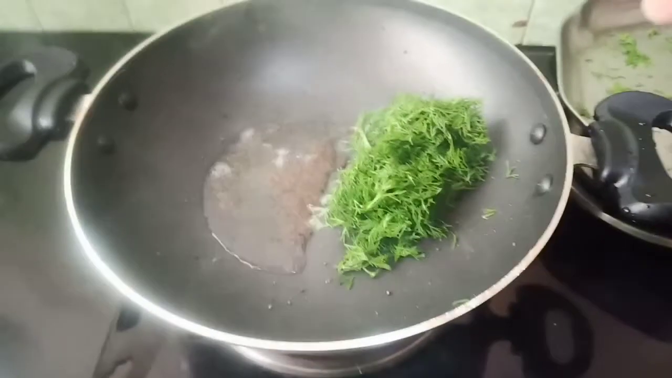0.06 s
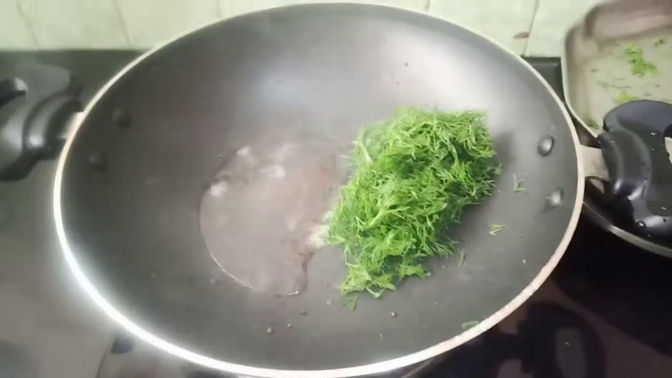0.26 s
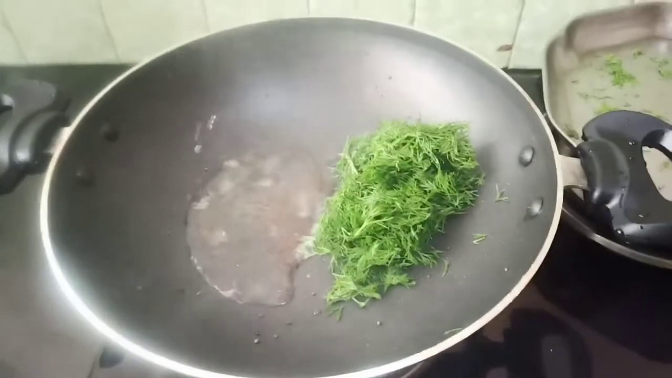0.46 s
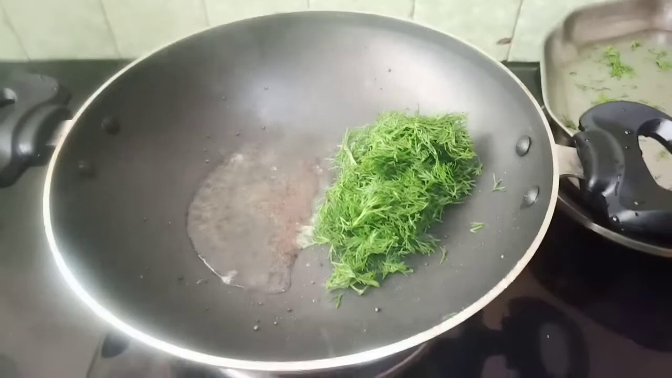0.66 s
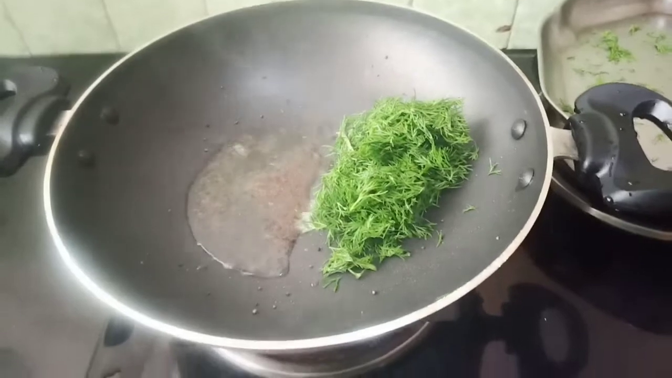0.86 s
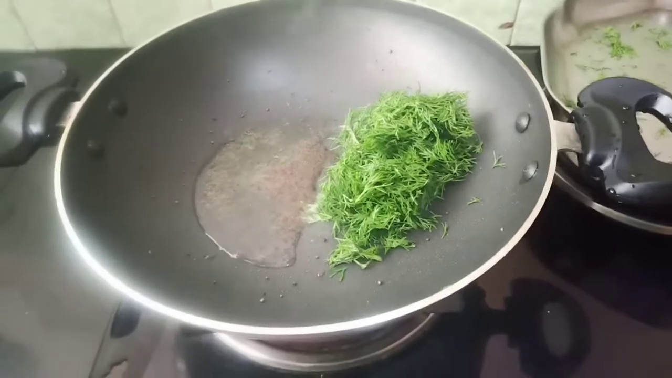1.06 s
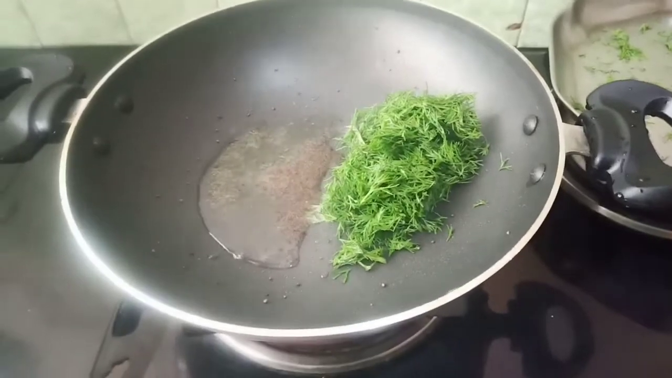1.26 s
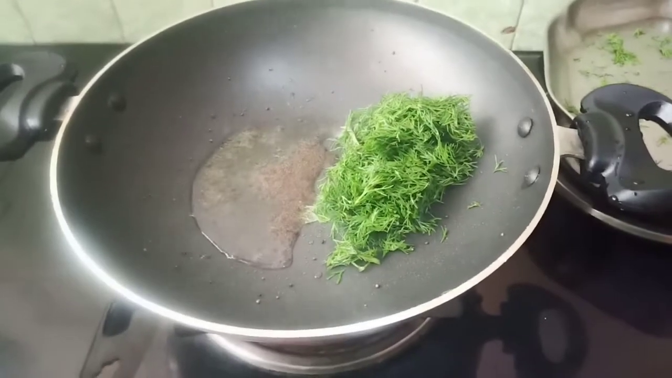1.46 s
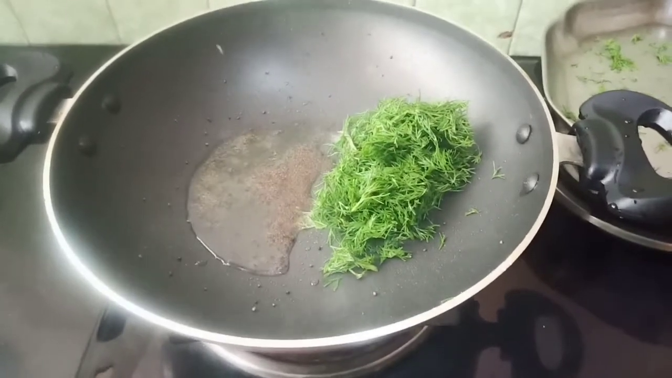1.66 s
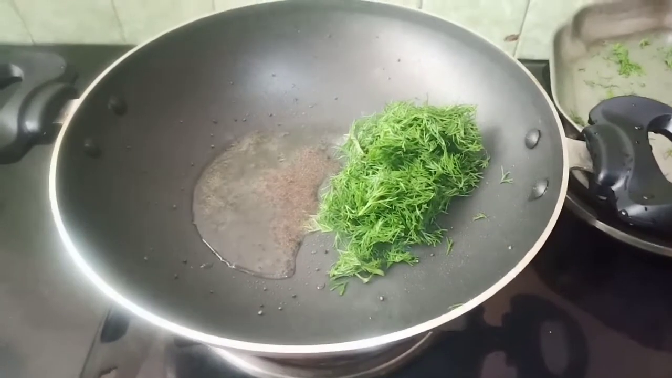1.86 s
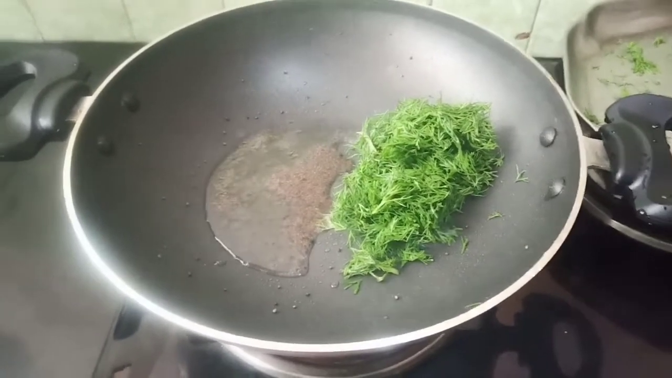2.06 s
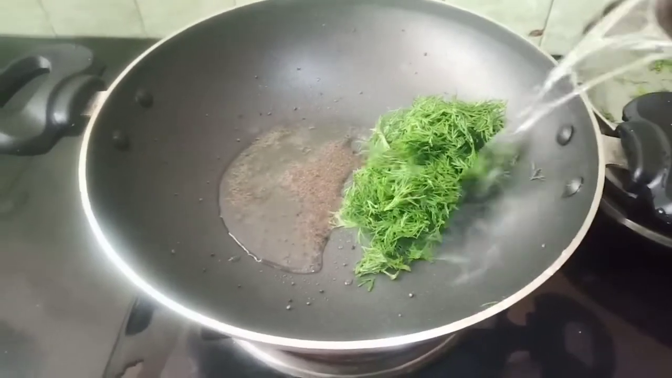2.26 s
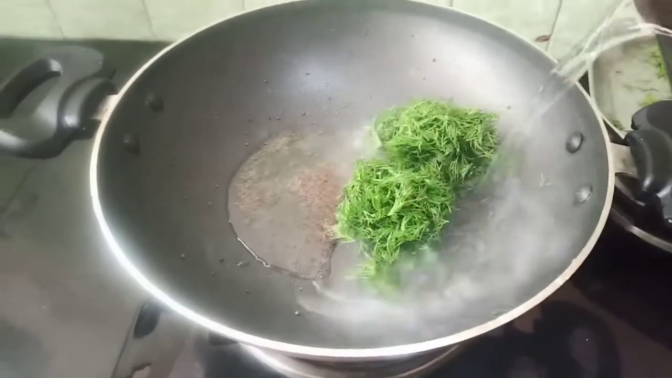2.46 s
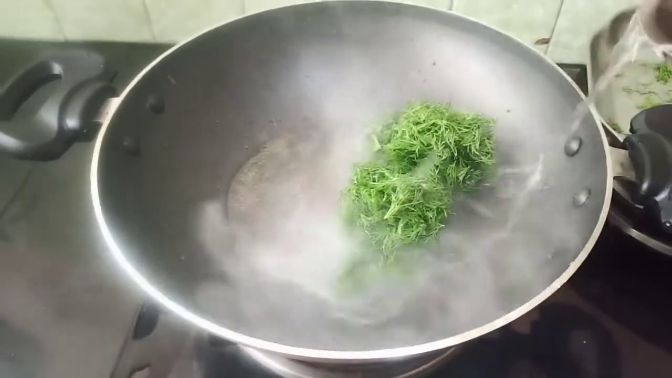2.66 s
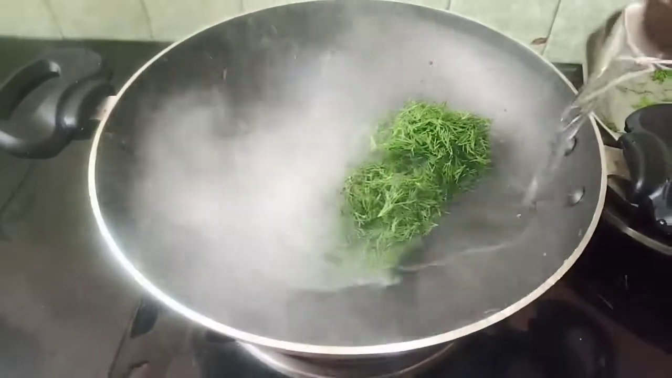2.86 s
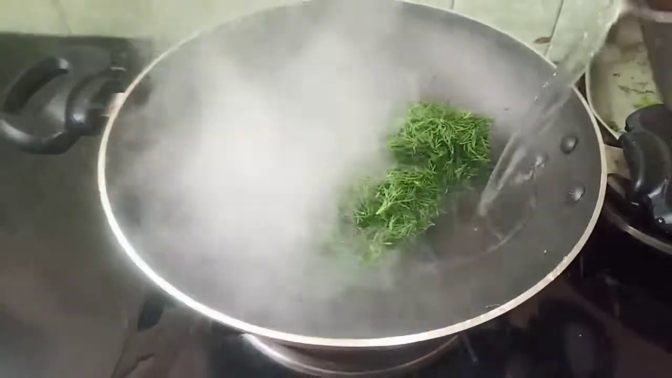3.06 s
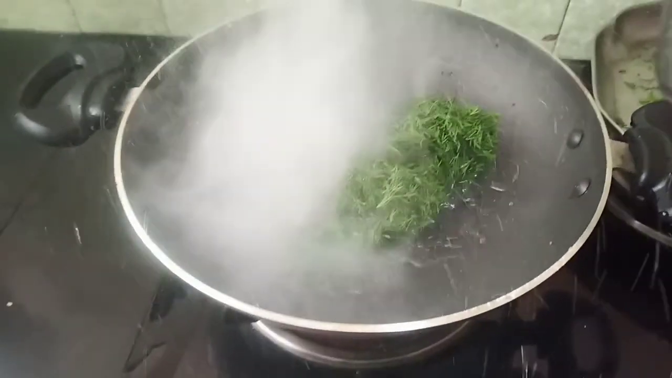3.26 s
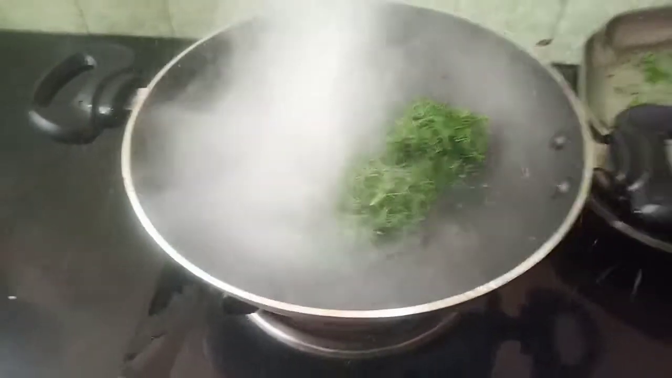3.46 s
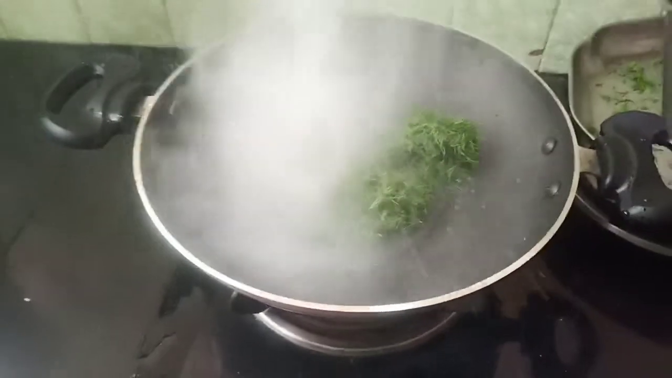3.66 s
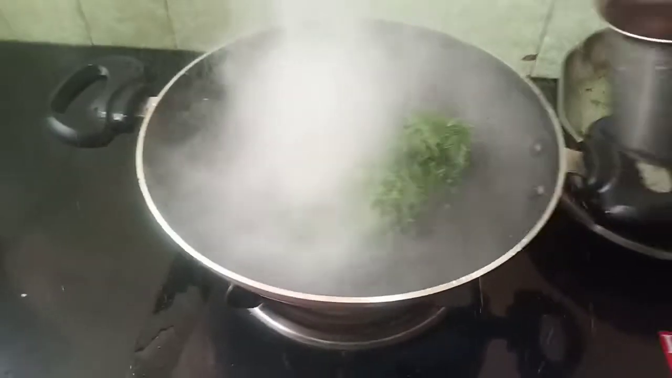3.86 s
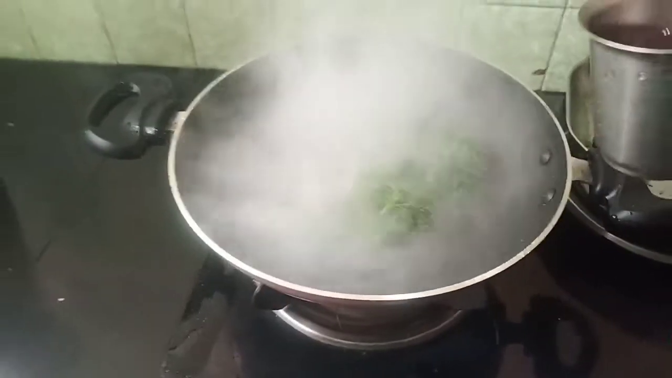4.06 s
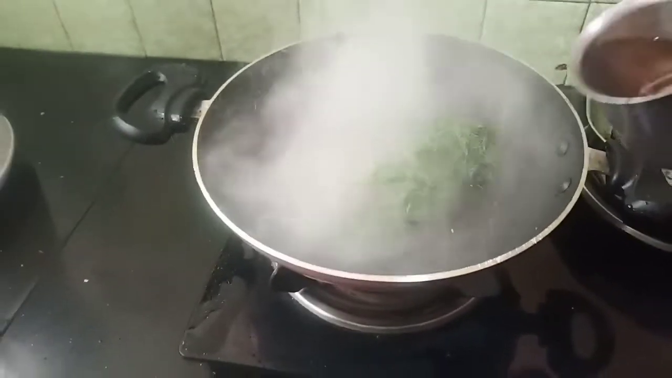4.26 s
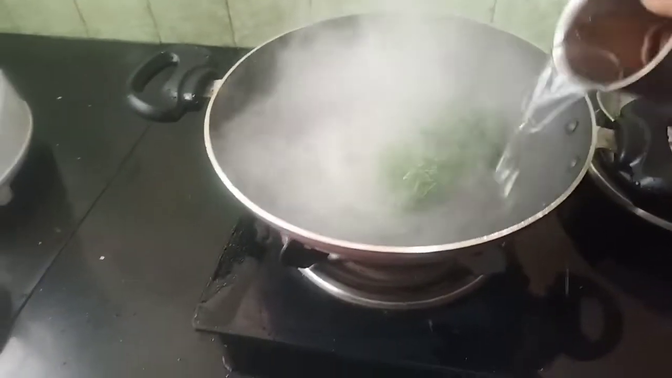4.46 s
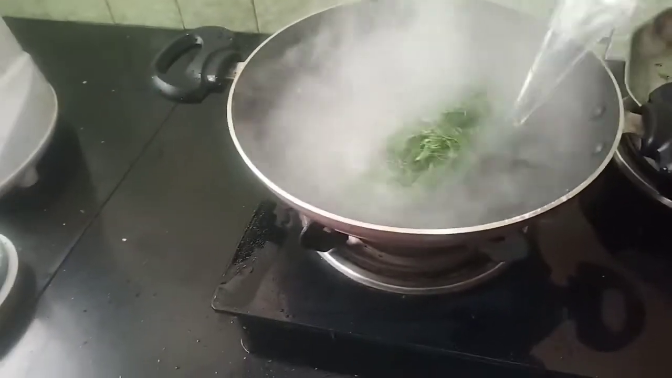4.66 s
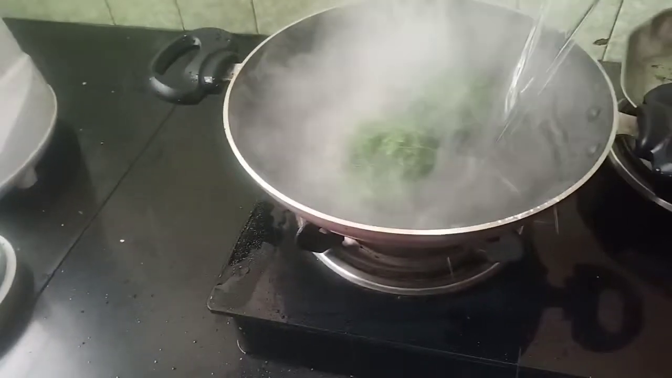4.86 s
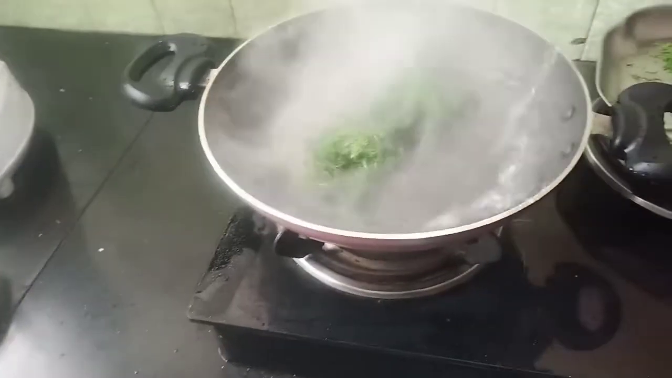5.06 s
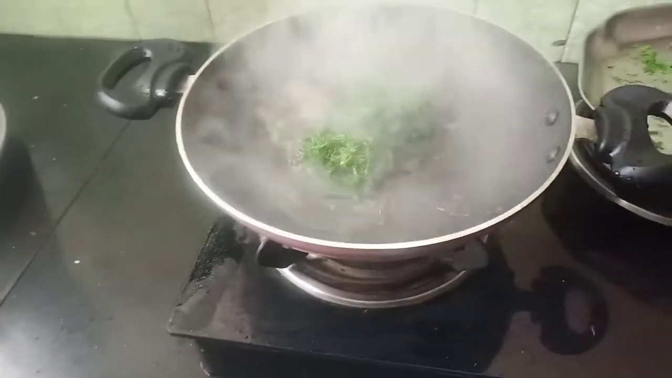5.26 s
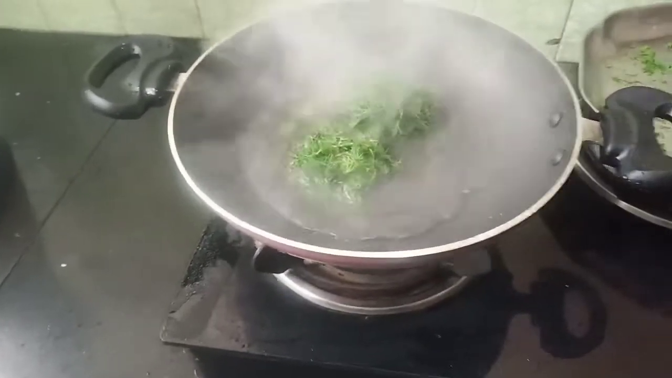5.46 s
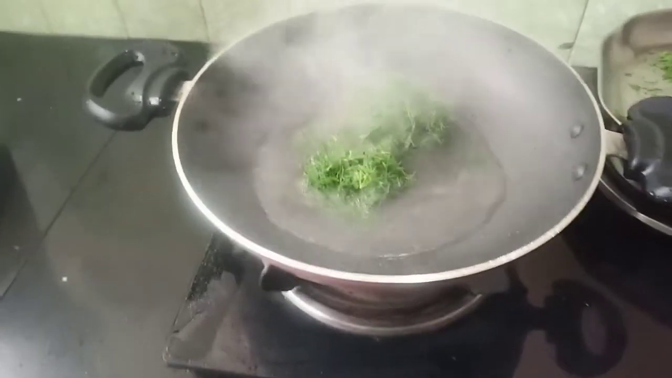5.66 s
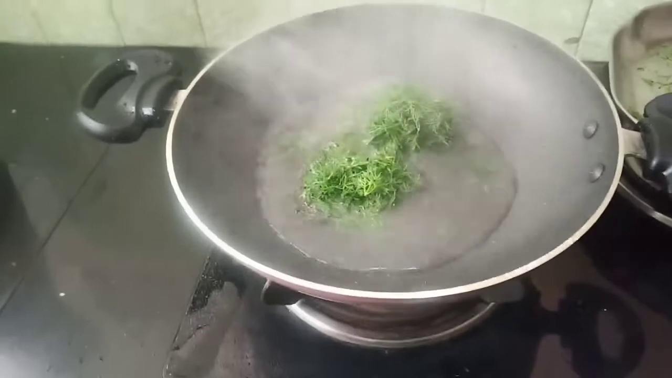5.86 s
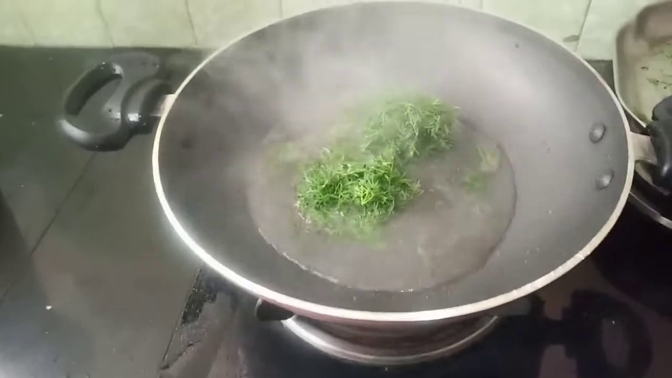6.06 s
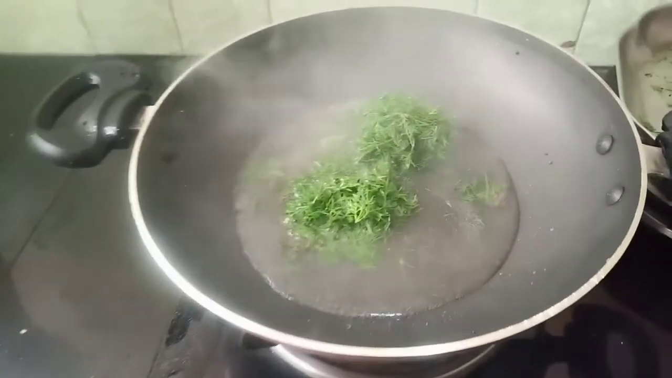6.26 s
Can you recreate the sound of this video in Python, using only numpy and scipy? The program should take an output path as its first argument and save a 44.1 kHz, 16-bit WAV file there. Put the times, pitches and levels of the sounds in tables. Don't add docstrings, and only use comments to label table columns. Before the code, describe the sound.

Hot oil crackles and spits sharply in a pan, then poured water boils off in a loud steaming hiss over a bubbling gurgle.

```python
import sys
import numpy as np
from scipy import signal
from scipy.io import wavfile
from scipy.ndimage import uniform_filter1d

SR = 44100
rng = np.random.default_rng(int(sys.argv[2]) if len(sys.argv) > 2 else 0)


def level_to_linear(level):
    exponent = np.asarray(level, float) / 20
    return 10 ** exponent


def transcribe(signal):
    frames = np.atleast_2d(signal).T
    limited = np.clip(frames, -1, 1)
    pcm = np.round(limited * 32767).astype(np.int16)
    wavfile.write(sys.argv[1], SR, pcm)


N = 279229


def unit(x):
    return x / np.sqrt(np.mean(x ** 2) + 1e-20)


def in_time(rows):
    s, *columns = np.transpose(rows)
    return [np.interp(np.arange(N) / SR, s, c) for c in columns]


def drift(rate):
    r = np.exp(-40 * np.pi * rate / SR)
    noise = rng.standard_normal(N // 20 + 2002)
    slow = signal.lfilter([1], [1, -2 * r, r * r], noise)[2000:]
    return np.interp(np.arange(N) / 20, np.arange(len(slow)), unit(slow))


def butter(x, hz, kind, order=2):
    return signal.sosfilt(signal.butter(order, hz, kind, fs=SR, output="sos"), x)


def clicks(times, sizes):
    out = np.full(N, 1e-18)
    np.add.at(out, np.clip((np.asarray(times) * SR).astype(int), 0, N - 1), sizes)
    return out


def ring(x, hz, t60):
    r, w = level_to_linear(-60 / (t60 * SR)), 2 * np.pi * hz / SR
    return signal.lfilter([0, np.sin(w)], [1, -2 * r * np.cos(w), r * r], x)


def peak(x, hz, width, db):
    r = np.exp(-np.pi * width / SR)
    w = 2 * np.pi * min(hz, .45 * SR) / SR
    resonance = signal.lfilter([1, 0, -1], [1, -2 * r * np.cos(w), r * r], x)
    return x + (level_to_linear(db) - 1) * (1 - r * r) / 2 * resonance


def grains(per_s, spread_db, clump_db):
    sizes = level_to_linear(spread_db * np.minimum(rng.exponential(1, N), 4.0)) * rng.choice([-1, 1], N)
    bursting = rng.random(N) < per_s * level_to_linear(clump_db * drift(40)) / SR
    return unit(sizes * bursting)


def flame():
    return level_to_linear(-79) * unit(butter(rng.standard_normal(N), [25, 135], "band"))


KITCHEN_T60_S = 0.41


def kitchen(x):
    t = np.arange(SR // 2) / SR
    tail = rng.standard_normal(len(t)) * level_to_linear(-60 * t / KITCHEN_T60_S) * (t > .004)
    tail = tail / np.sqrt(np.sum(tail ** 2))
    return signal.fftconvolve(x, butter(tail, 6200, "low"))[:N]


# start_s [s], peak_db [dB], pitch_hz [Hz], t60_s [s]
GULPS = [(.075, -52, 335, 0.064), (0.151, -52, 344, 0.087)]


def gulps():
    low_rings = sum(ring(clicks([s], level_to_linear(db)), hz, t60) for s, db, hz, t60 in GULPS)
    return butter(low_rings, [200, 500], "band")


# start_s [s], depth_db [dB], recovery_s [s]
LULLS = [(5.134, -7, .03), (4.508, -3, .02)]


def lulls():
    t = np.arange(N) / SR
    return level_to_linear(sum(db * np.exp(-np.maximum(t - s, 0) / back) * (t > s) for s, db, back in LULLS))


# time_s [s], level_db at 7 kHz [dB]
VIGOUR = [(0.0, -33), (0.3, -29), (0.6, -32), (1.0, -32), (1.3, -32.5), (1.55, -29.5), (2.15, -30),
          (2.38, -24), (2.75, -28), (3.1, -23.5), (3.5, -25), (4.0, -27.5), (4.45, -25), (4.9, -25),
          (5.3, -27), (5.7, -27.5), (6.0, -31.5), (6.33, -33)]
# centre_s [s], rise_db [dB], half_width_s [s]
FLARES = [(0.155, 6, 0.012), (0.215, 3.5, 0.015), (0.693, 3.5, 0.01), (2.13, 3, 0.014), (2.515, 2, 0.0085),
          (3.582, 0.5, 0.022), (3.956, 3.5, 0.065), (4.919, 2.5, 0.015), (5.093, 2.5, 0.023),
          (5.273, 2.5, 0.032), (5.443, 2.2, 0.018)]
# centre_s [s], dip_db [dB], half_width_s [s]
PAUSES = [(0.105, -5, 0.01), (0.524, -6.5, 0.026), (0.763, -5.5, 0.018), (0.823, -1.5, 0.023),
          (0.903, -0.5, 0.017), (1.127, -4, 0.012), (1.611, -3, 0.03), (1.836, -3, 0.087),
          (1.976, -4.5, 0.02), (2.21, -5, 0.069), (2.26, 0, 0.012), (2.599, -3, 0.031), (2.664, -5, 0.0087),
          (2.814, -3, 0.023), (2.973, -2.0, 0.013), (3.273, -2, 0.079), (3.866, -1.5, 0.012),
          (4.525, -2.5, 0.012), (4.624, -5.5, 0.057), (4.859, -2.5, 0.024), (5.158, -6.5, 0.019),
          (5.343, -1.5, 0.011), (5.493, -5.5, 0.015), (5.577, -2.5, 0.02), (5.677, -4.4, 0.013),
          (5.762, -3.5, 0.011), (5.907, -4, 0.023), (5.996, -6, 0.0093), (6.191, -2, 0.016),
          (6.256, -5.5, 0.012)]


def vigour():
    t, level_db = np.arange(0, N, 40) / SR, in_time(VIGOUR)[0]
    bells = sum(db * np.exp(-.5 * ((t - s) / width) ** 2) for s, db, width in FLARES + PAUSES)
    level_db = level_db + np.interp(np.arange(N) / SR, t, bells)
    return level_db, level_db - uniform_filter1d(level_db, size=SR // 2)


# time_s [s], amount [0-1]
WATER = [(0, 0.23), (.3, 0.53), (.5, 0), (.9, 0.1), (1.25, -.25), (1.5, -.25), (1.8, 0.2), (2.15, 0.12),
         (2.4, 0.36), (2.55, 0.78), (3.0, 0.82), (3.6, 0.99), (4.05, 0.98), (4.55, 0.93), (5.13, 1.04),
         (5.5, 1), (5.7, 1), (6.33, 0.79)]
# time_s [s], amount [0-1]
CHURN = [(0, 0.33), (.3, 0.48), (.5, 0.2), (1.4, 0), (1.57, 0.1), (1.75, 0.03), (2.2, 0.06), (2.5, 0.63),
         (3.1, 1.1), (3.3, 1), (3.54, 1.15), (4.05, 0.94), (4.36, .9), (4.53, 1.05), (4.92, 0.89),
         (5.4, 0.84), (6.08, .5), (6.33, 0.78)]
# time_s [s], coarseness_db [dB]
COARSE = [(0, 0.5), (.2, -3), (.55, 1), (.95, 2), (1.3, 1), (1.6, 1.7), (2.15, -0.5), (2.4, -1), (2.7, 0.3),
          (3.1, -0.9), (3.6, 0.4), (4.0, -0.2), (4.45, 0.8), (4.9, 0), (5.15, 2.5), (5.35, -0.3),
          (5.8, 0.9), (6.33, 0.2)]
# pitch_hz [Hz], level_db [dB per Hz]
BOIL_COLOUR = [(60, -4), (100, -6.5), (150, -1.5), (300, -2), (420, 2), (560, -1), (800, -3), (1300, -2.5),
               (2300, 0)]
SMALL_DB, SMALL_WET_DB = -24.0, 8.5
LARGE_DB, LARGE_WET_DB = -79.5, 26.5
RUMBLE_DB, RUMBLE_CHURN_DB = -79.5, 27.5
SMALL_COARSE = 0.99


def boil():
    water_share, slow_db = in_time(WATER)[0], in_time(VIGOUR)[0]
    pulse_db = vigour()[0] - slow_db
    small_db = slow_db + SMALL_DB + SMALL_WET_DB * water_share + SMALL_COARSE * in_time(COARSE)[0]
    large_db = LARGE_DB + LARGE_WET_DB * water_share
    rumble_db = RUMBLE_DB + RUMBLE_CHURN_DB * in_time(CHURN)[0]
    levels_db = (rumble_db + 15, large_db + 19, small_db + 12)
    bubbles = grains(per_s=1200, spread_db=5.0, clump_db=3.0)
    water = rng.standard_normal((2, N))
    out, edges = 0, 480 * 1.499 ** np.arange(-5, 5)
    points_hz, points_db = np.transpose(BOIL_COLOUR)
    for k, (low, high) in enumerate(zip(edges, edges[1:])):
        hz = np.sqrt(low * high)
        level_db = levels_db[np.searchsorted([480, 720], hz)]
        colour_db = np.interp(np.log(hz), np.log(points_hz), points_db)
        band = butter(0.38 * bubbles + 0.87 * water[k % 2], [low, high], "band", order=3)
        out = out + band * level_to_linear(level_db + colour_db + 1.4 * drift(12))
    return out * level_to_linear(pulse_db)


# start_s [s], peak_db [dB], pitch_hz [Hz], t60_s [s]
BUBBLES = [(0.0316, -29.5, 3250, 0.023), (.0787, -37, 3430, .02), (.171, -26.5, 2200, 0.0042),
           (0.198, -33, 1300, 0.0058), (.2024, -36, 3600, 0.078), (0.22, -26, 3780, .018),
           (0.272, -28, 4080, 0.017), (.3326, -30, 3330, .015), (.3561, -29, 3560, 0.032),
           (.3575, -22.5, 1880, 0.013), (0.3576, -16, 1230, 0.0029), (0.377, -29, 1570, 0.016),
           (.7075, -24.5, 3610, 0.021), (.7205, -36, 3500, .025), (.7075, -38, 2690, .005),
           (3.885, -5, 3000, 0.00073)]
BUBBLE_ECHO_DB = -3.5
# start_s [s], level_db [dB]
PAN_KNOCKS = [(0.9081, -26.5), (1.5202, -19.5)]
# pitch_hz [Hz], level_db [dB], t60_s [s], echo_db [dB]
PAN_MODES = [(2395, -0.5, 0.03, 3), (2400, -19, 0.49, -4), (1740, -11, 0.036, -12), (1370, -29, .015, -13),
             (3470, -13, 0.032, -9), (2160, -22, 0.038, 8)]
# start_s [s], level_db [dB]
CUP_KNOCKS = [(5.8475, -25.5)]
# pitch_hz [Hz], level_db [dB], t60_s [s], echo_db [dB]
CUP_MODES = [(3720, 1.5, 0.037, -8), (3812, -10, 0.27, -12), (6640, -1.5, .1, -8), (1230, -4, 0.056, 1.5),
             (1160, -20, .06, 7)]
CRACK_DB, CRACK_S = -4, 0.0025


def pings():
    out = np.zeros((2, N))
    rows = [(s, db, hz, t60, BUBBLE_ECHO_DB) for s, db, hz, t60 in BUBBLES]
    for knocks, modes in ((PAN_KNOCKS, PAN_MODES), (CUP_KNOCKS, CUP_MODES)):
        for s, db in knocks:
            rows += [(s, db + mode_db, hz, t60, echo_db) for hz, mode_db, t60, echo_db in modes]
    for s, db, hz, t60, echo_db in rows:
        start = int(s * SR)
        hit = clicks([0], level_to_linear(db))[:min(N - start, SR // 4)]
        out[:, start:start + len(hit)] += ring(hit, hz, t60) * level_to_linear(np.array([[0], [echo_db]]))
    s, db = np.transpose(PAN_KNOCKS + CUP_KNOCKS)
    decay = np.exp(-1 / (CRACK_S * SR))
    crack = signal.lfilter([1], [1, -decay], clicks(s, level_to_linear(db + CRACK_DB))) * rng.standard_normal(N)
    return butter(out + butter(crack, 5000, "low"), 960, "high", order=4)


# start_s [s], step_db [dB], direction [+1 or -1]
THUMPS = [(.5258, -9, 1), (2.63, -19.5, -1), (2.658, -24.5, -1), (2.7295, -8, -1), (2.8886, -12.5, -1),
          (2.8925, -7, 1), (2.9251, -15, 1), (2.93, -15.5, -1), (2.9465, -17, -1), (3.0308, -16.5, -1),
          (3.056, -5.5, 1), (3.0606, -4.5, -1), (3.0713, -12, -1), (3.074, -16, 1), (3.0966, -15, 1),
          (3.1345, -18, 1), (3.1518, -17, -1), (3.1744, -9, -1), (3.1761, -16, 1), (3.1772, -2.5, 1),
          (3.18, -11, -1), (3.2005, -11.5, 1), (3.2009, -10, -1), (3.2083, -13, -1), (3.2773, -12.5, 1),
          (3.6296, -12, 1), (3.6766, -4, -1), (3.7048, -23, 1), (3.787, -23, 1), (3.8225, -12.5, 1)]
# start_s [s], step_db [dB], direction [+1 or -1]
MORE_THUMPS = [(3.039, -19, 1), (3.0791, -19, 1), (3.1485, -24, -1), (3.3252, -25, -1), (3.7513, -25, 1)]


def thumps():
    s, db, direction = np.transpose(THUMPS + MORE_THUMPS)
    steps = np.cumsum(clicks(s, np.sign(direction) * level_to_linear(db)))
    pole = np.exp(-2 * np.pi * 700 / SR)
    soft = signal.lfilter([1 - pole], [1, -pole], steps)
    return 0.5 * soft + 0.33 * butter(steps, 4300, "low")


# start_s [s], peak_db [dB]
SEED_SPITS = [(.0293, -14.5), (.065, -15.3), (.0808, -14.7), (.102, -15), (.1319, -15.4), (.1428, -11.7),
              (.154, -12.7), (.2185, -13), (.2512, -13.8), (.268, -13.3), (.299, -13.9), (.4292, -15.2),
              (.4791, -14.9), (.6792, -14.9), (.7078, -14.9), (.7234, -12.2), (.8078, -14), (.8891, -14.1),
              (.9026, -14.4), (.9639, -13), (1.1081, -14.6), (1.1693, -17.1), (1.2751, -15.6),
              (1.4838, -16.5), (1.5699, -15.1), (1.6156, -14.9), (2.0815, -16.4), (2.1303, -15.8),
              (2.1538, -14.2), (2.2451, -15.5)]
# start_s [s], peak_db [dB]
WATER_SPITS = [(2.6119, -12.8), (2.7292, -12.4), (2.8884, -8.1), (2.9209, -11.2), (3.1051, -9.5),
               (3.1169, -8), (3.3254, -11), (3.6116, -9.7), (3.8237, -9.4), (3.886, -11.5), (4.4032, -11),
               (4.5622, -9.6), (4.6027, -9.6), (4.6274, -12.9), (4.832, -11.8), (5.3386, -10.2),
               (5.477, -14), (5.5245, -13.6), (5.6007, -14.3), (5.6415, -14), (5.7155, -13.2),
               (5.7937, -13.7), (5.8476, -10), (5.946, -14.7), (6.0355, -16.9), (6.0884, -14.5),
               (6.1774, -13.5), (6.2491, -17.8), (6.2998, -16.2), (6.3152, -15.1)]
STRAY_SPITS_PER_S, STRAY_OVER_DB, STRAY_SPREAD_DB = 36, 14.5, 1.5


def spits():
    s, db = np.transpose(SEED_SPITS + WATER_SPITS)
    snaps = clicks(s, level_to_linear(db + 1.3) * rng.choice([-1, 1], len(s)))
    showing = np.clip(-(in_time(VIGOUR)[0] + 24) / 6, .1, 1)
    stray = rng.random(N) < STRAY_SPITS_PER_S * showing / SR
    stray_db = vigour()[0] + STRAY_OVER_DB + STRAY_SPREAD_DB * rng.standard_normal(N)
    snaps = snaps + stray * level_to_linear(stray_db) * rng.choice([-1, 1], N)
    decay = np.exp(-1 / (.0006 * SR))
    puffs = signal.lfilter([0, 0, .14], [1, -decay], abs(snaps)) * rng.standard_normal(N)
    return butter(snaps + puffs, 2200, "high")


# time_s [s], crackle_share [0-1]
CRACKLE = [(0, 0.81), (2.2, 0.65), (2.4, 0.55), (3.5, 0.63), (4.4, 0.62), (5.4, 0.84), (6.33, 0.84)]
TOP_DB, MIDDLE_DB, MIDDLE_WET_DB = -5, -12.5, 2
TOP_LAGS, MIDDLE_LAGS = 0.41, 0.1
TOP_COARSE = 0.48
PATCH_DB, PATCH_PER_S = 0.64, 3.5


def sizzle(crackle, surge):
    core_db, swing_db = vigour()
    coarse_db = in_time(COARSE)[0]
    top_db = TOP_DB - TOP_LAGS * swing_db + TOP_COARSE * coarse_db
    middle_db = MIDDLE_DB + MIDDLE_WET_DB * in_time(WATER)[0] - MIDDLE_LAGS * swing_db + coarse_db
    share = np.clip(in_time(CRACKLE)[0], 0, 1)
    steam = rng.standard_normal((2, N))
    out, edges = 0, np.geomspace(2400, 17000, 10)
    for k, (low, high) in enumerate(zip(edges, edges[1:])):
        hz = np.sqrt(low * high)
        tilt_db = middle_db * np.clip((6200 - hz) / 1500, 0, 1) + top_db * np.clip((hz - 8500) / 2100, 0, 1)
        offset_db = np.interp(hz, [3000, 3990, 5190, 7350, 9900, 14500],
                              [9.16, 12.84, 7.56, 0.055, 5.72, 5.36])
        snappy = share * np.interp(hz, [3000, 10000], [.6, 1])
        jet = steam[k % 2] * level_to_linear(0.54 * drift(30))
        band = butter(np.sqrt(snappy) * crackle + np.sqrt(1 - snappy) * jet, [low, high], "band")
        out = out + band * level_to_linear(tilt_db + offset_db + PATCH_DB * drift(PATCH_PER_S))
    return out * level_to_linear(core_db - 2.46 + 0.78 * surge)


# pitch_hz [Hz], width_hz [Hz], lift_db [dB]
PORT = [(7185, 1226, 13), (16330, 4900, 11.5), (2220, 140, 2.5), (1380, 295, 4), (589.4, 30, 10),
        (692, 15, 7), (3440, 1420, 3.5)]


def scene():
    snaps, (rings, sent) = spits(), pings()
    crackle, surge = grains(per_s=4500, spread_db=6.0, clump_db=2.5), drift(29)
    frying = (sizzle(crackle, surge) + boil() * level_to_linear(1.4 * surge)) * lulls()
    echoes = kitchen(level_to_linear(-17) * snaps + sent)
    air = frying + snaps + rings + gulps() + echoes
    for hz, width, db in PORT:
        air = peak(air, hz, width, db)
    return np.tile(air + flame() + thumps(), (2, 1))


def roll_off(x):
    return signal.sosfilt(signal.butter(12, 16850, fs=SR, output="sos"), x)


SELF_NOISE_DB, CUTOFF_HZ = -86, 15470


def record(dry):
    cut = butter(dry, 76, "high", order=4)
    cut = cut + level_to_linear(SELF_NOISE_DB) * unit(butter(rng.standard_normal(N), 60, "low"))
    cut = signal.sosfilt(signal.ellip(14, .3, 85, CUTOFF_HZ, fs=SR, output="sos"), cut)
    return roll_off(cut)


dry = scene()
out = record(dry)
transcribe(out)
```